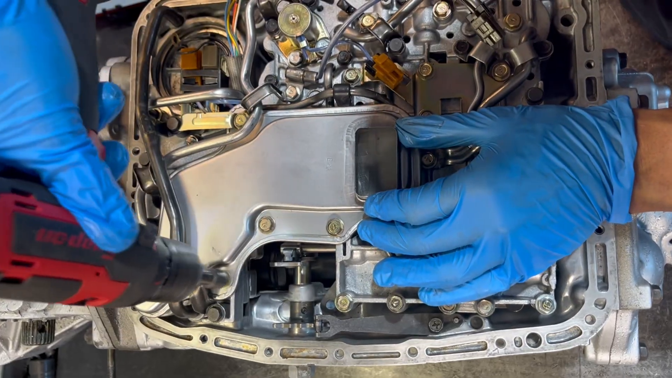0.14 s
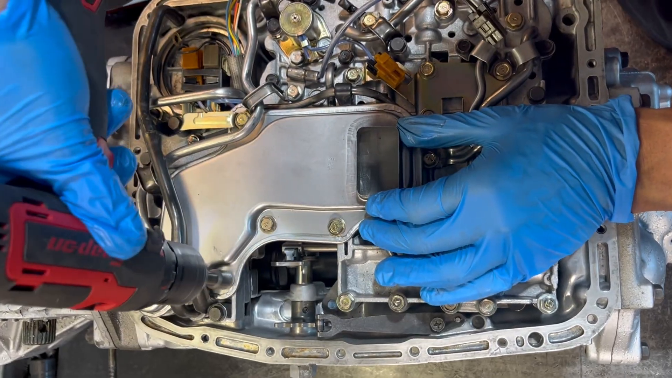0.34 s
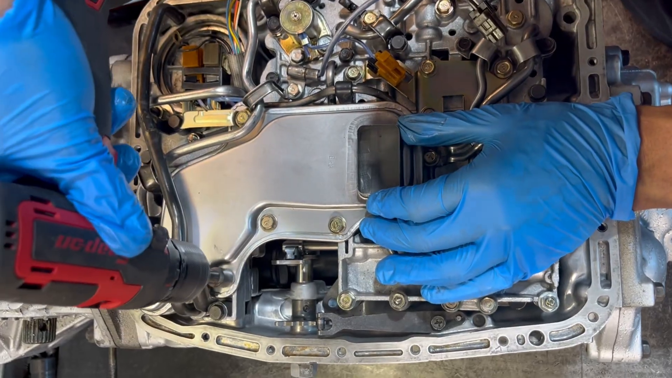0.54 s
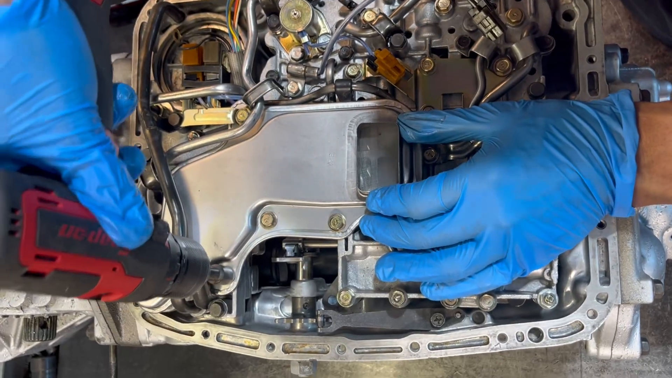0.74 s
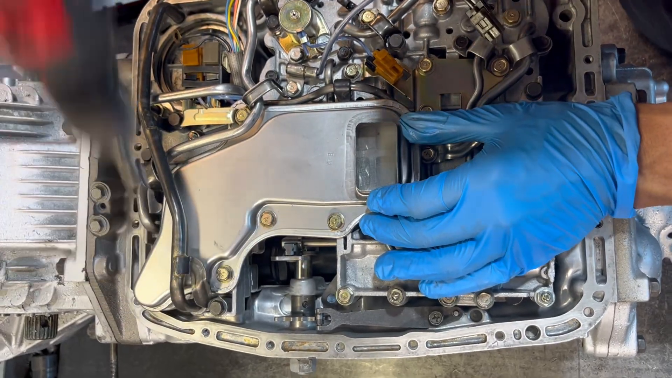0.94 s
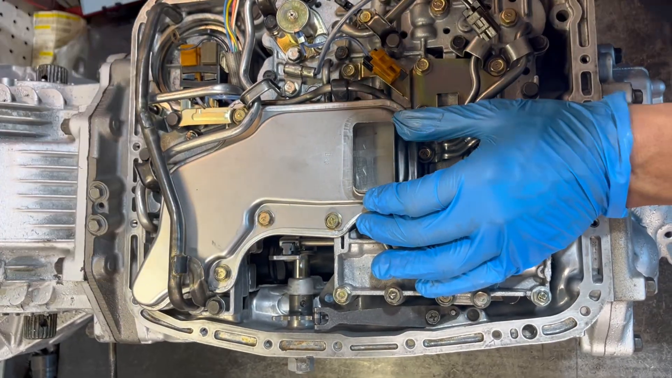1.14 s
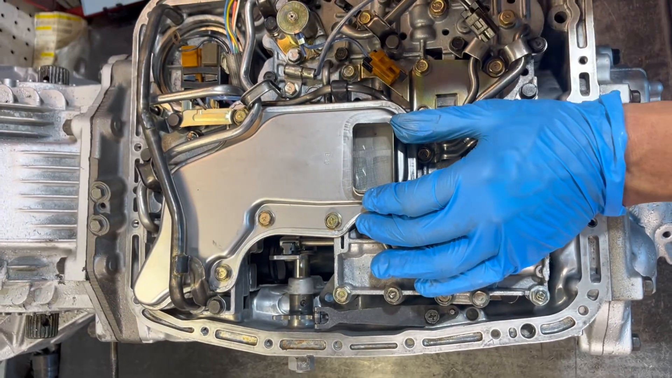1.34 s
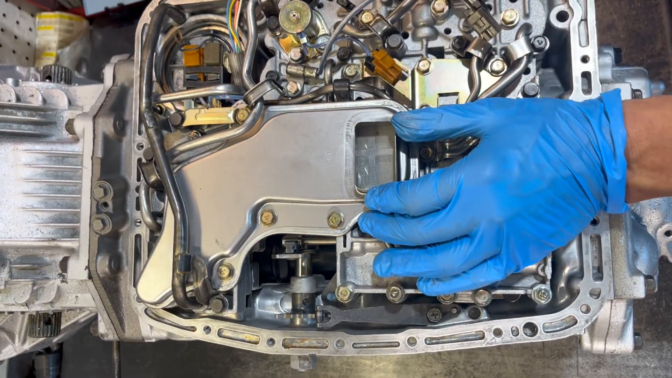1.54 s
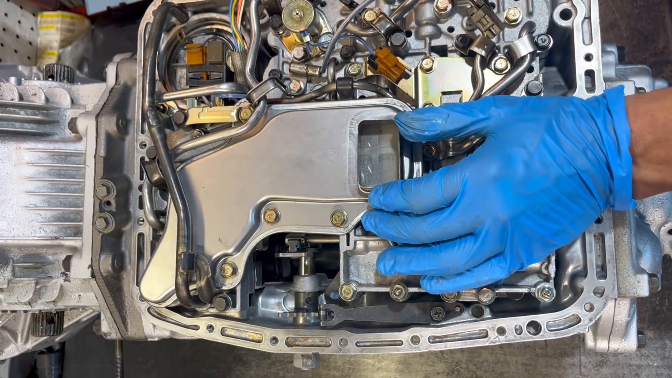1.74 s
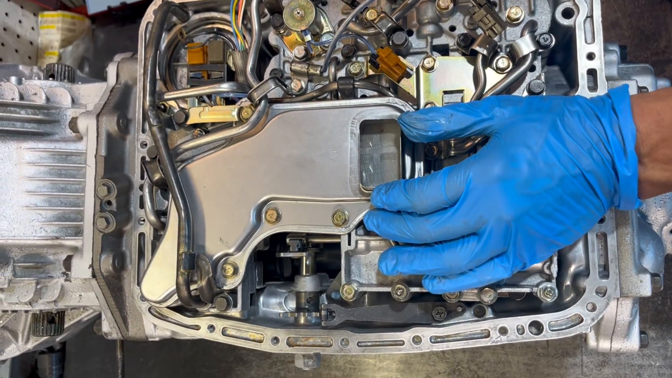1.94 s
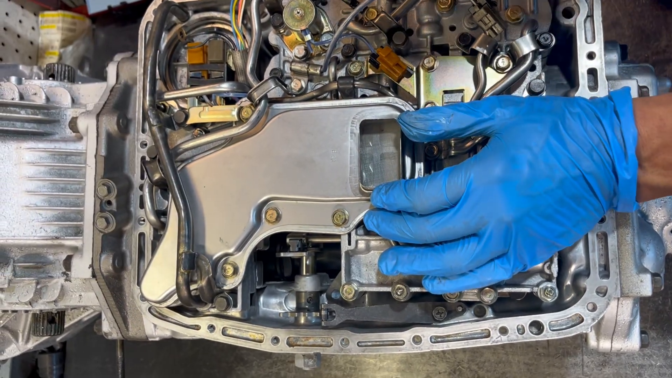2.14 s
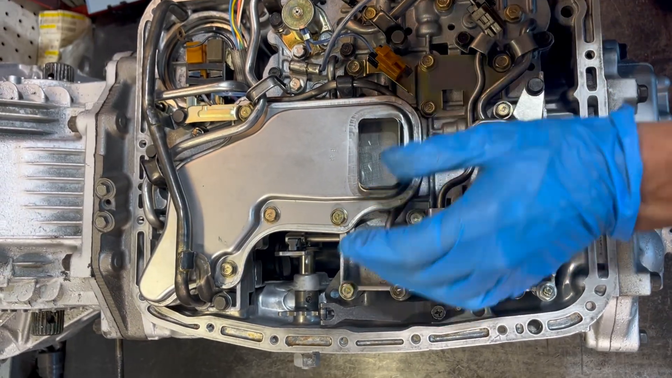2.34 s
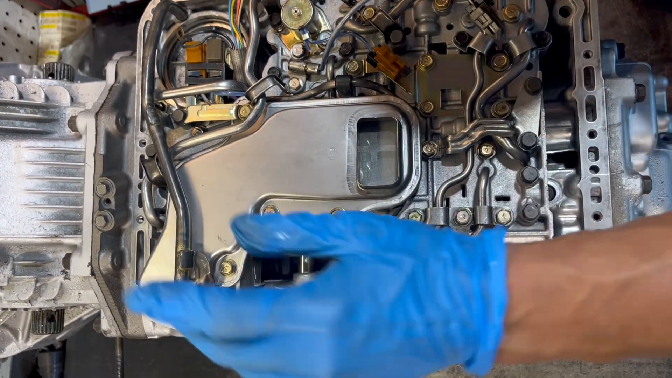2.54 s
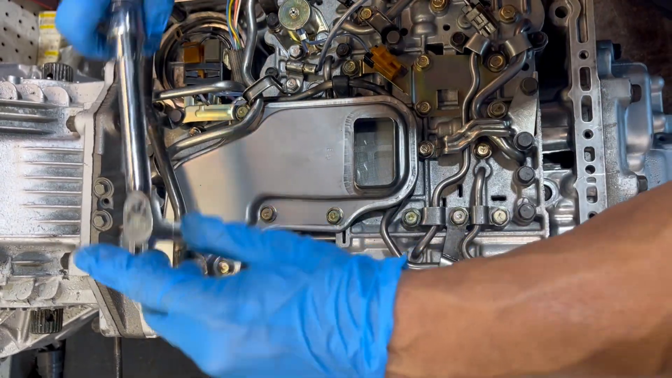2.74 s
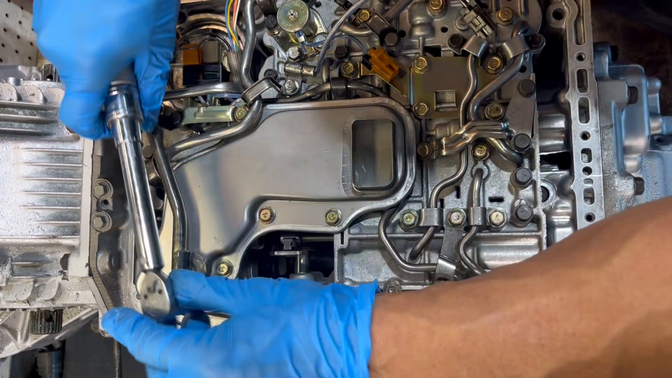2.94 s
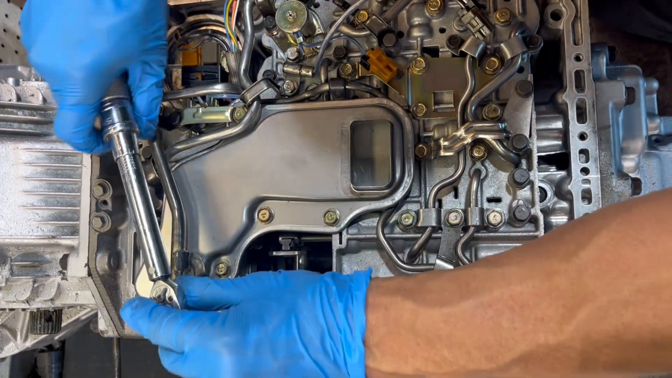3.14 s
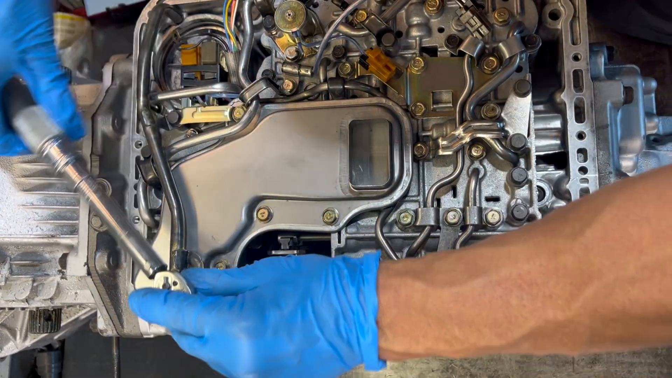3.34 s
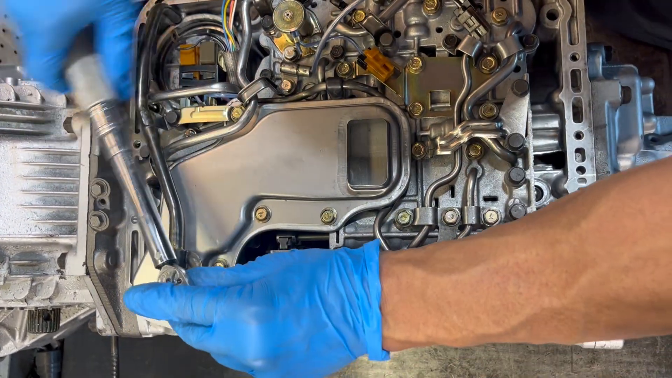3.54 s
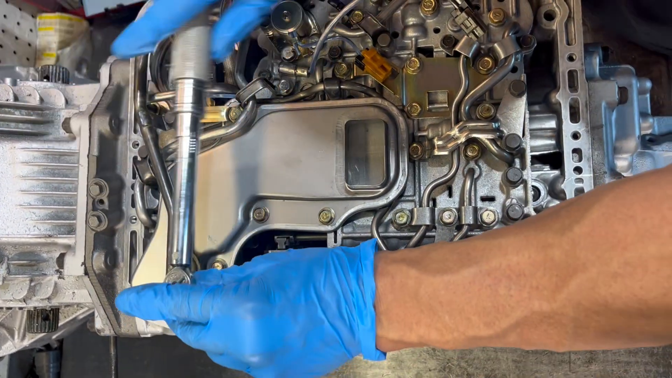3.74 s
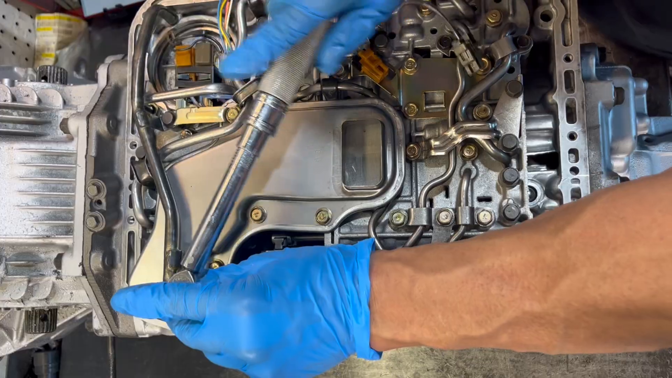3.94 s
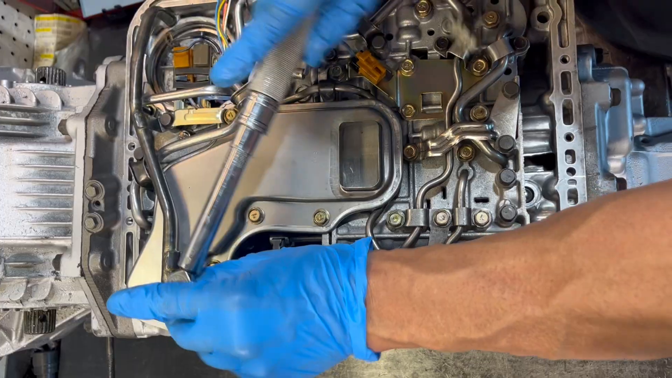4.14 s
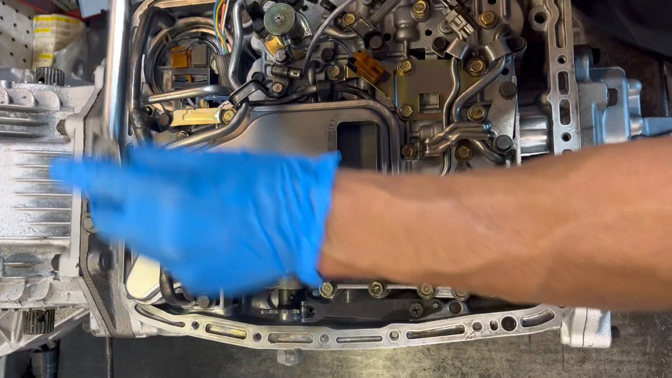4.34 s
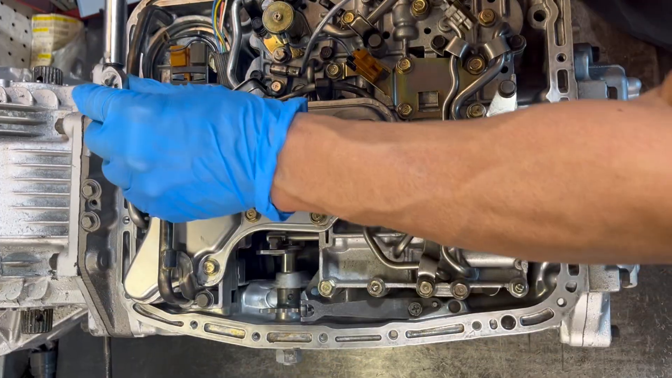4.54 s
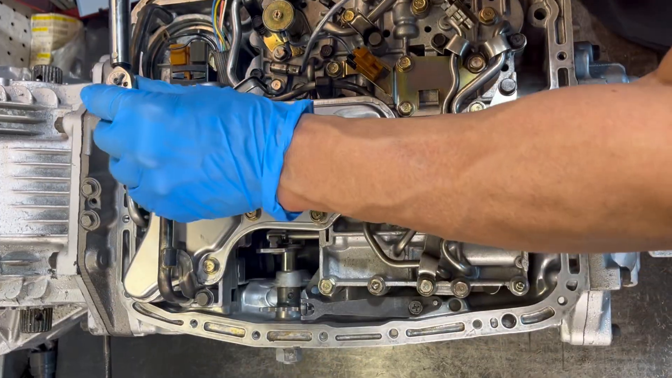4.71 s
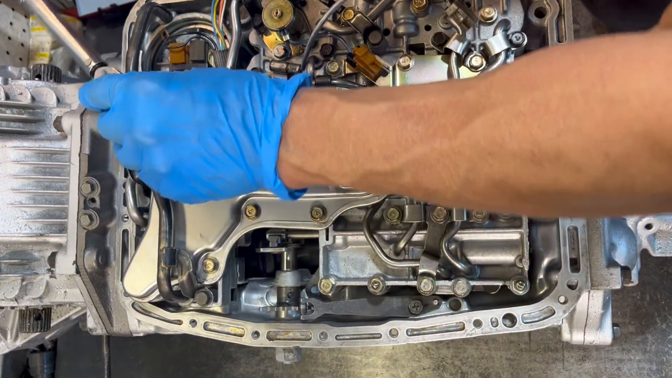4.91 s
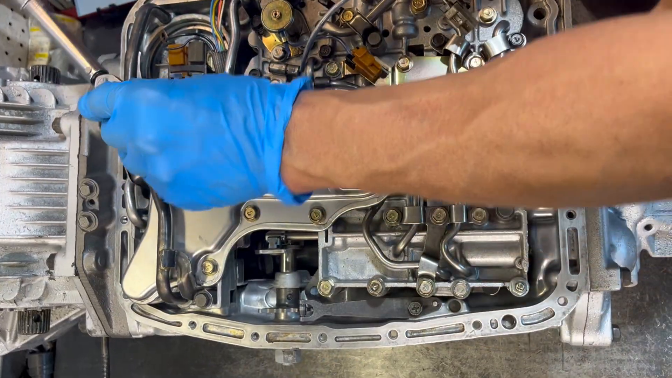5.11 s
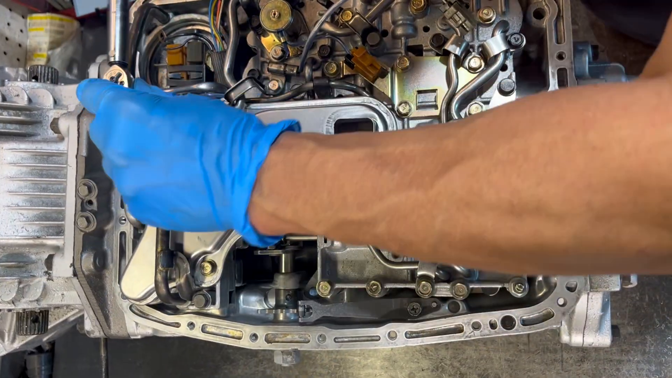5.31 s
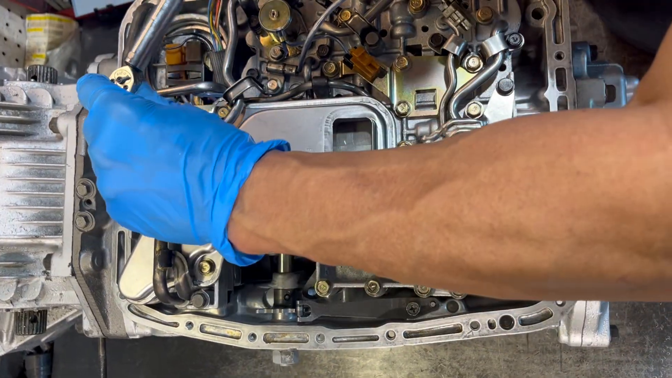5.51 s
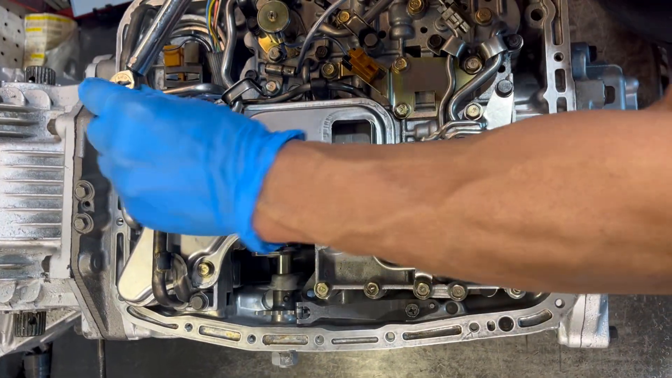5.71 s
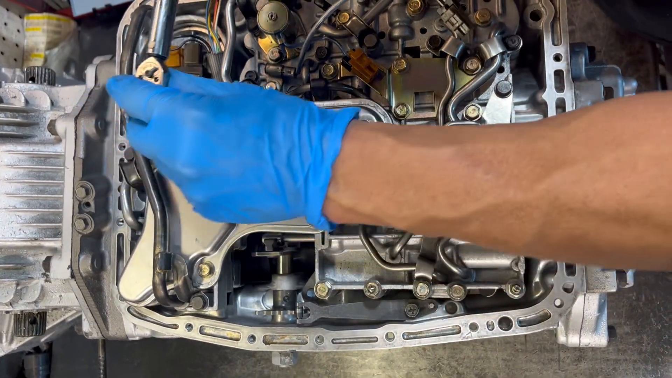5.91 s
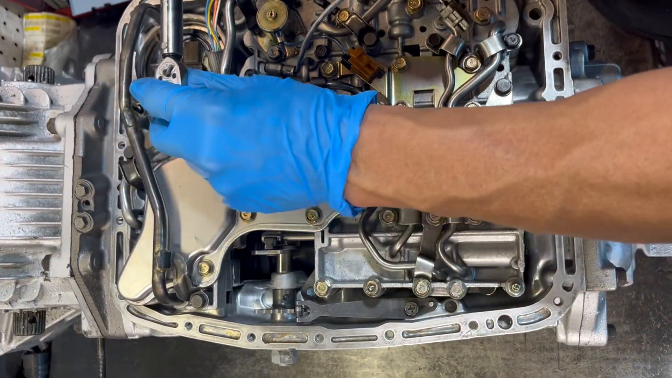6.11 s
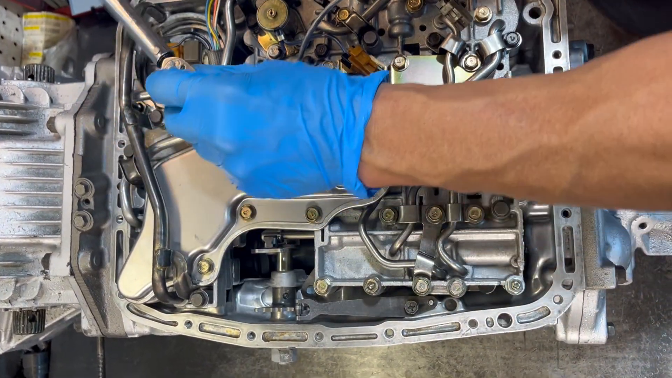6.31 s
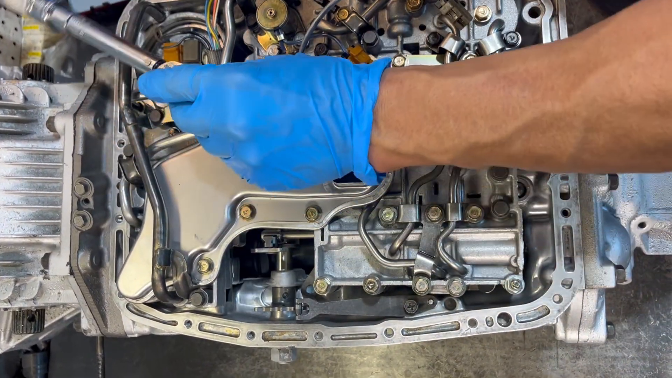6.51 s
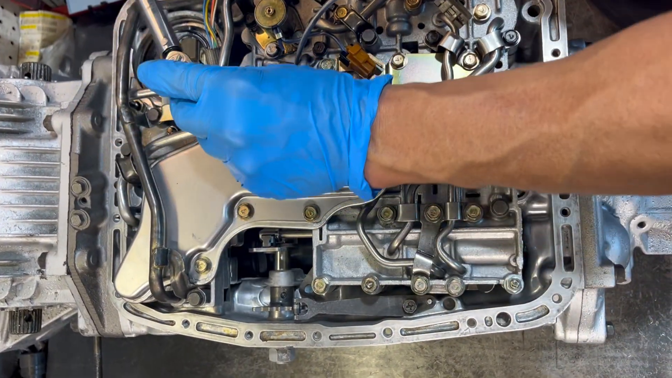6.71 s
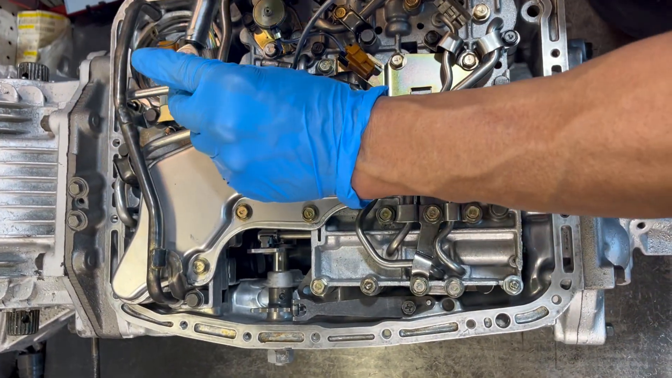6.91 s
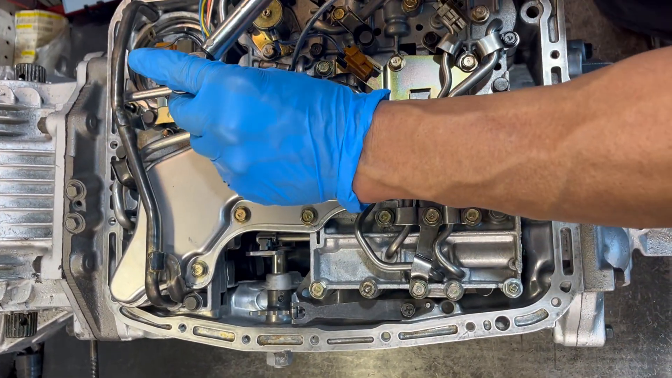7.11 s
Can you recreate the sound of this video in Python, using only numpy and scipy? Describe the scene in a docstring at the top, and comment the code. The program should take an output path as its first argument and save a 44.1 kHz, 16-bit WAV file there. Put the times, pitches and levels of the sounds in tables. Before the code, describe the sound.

A cordless driver whirs up and brakes, thuds down on a bench, then a ratcheting torque wrench clicks sharply on metal in a quiet workshop.

```python
"""In a workshop with a low rumble, a cordless driver runs a bolt into an aluminium casing and brakes.
It turns slowly, then at full speed: modulated gear noise, rotor overtones and a hum follow its speed.
It is dropped on a bench nearby, whose damped modes sound at each bounce. Then a torque wrench is set on
bolt heads, clicks over and ratchets back: short noise cracks with decaying modes. Faint coloured noise is
a settling rattle, then rustling gloves. A two-port pickup and a decaying room tail place the sources."""
import sys
import numpy as np
from scipy import signal
from scipy.fft import rfft, irfft
from scipy.io import wavfile
from scipy.ndimage import uniform_filter1d

SR = 44100
rng = np.random.default_rng(int(sys.argv[2]) if len(sys.argv) > 2 else 0)


def put_to_file(sound):
    """Save the sound as 16-bit audio at rate SR, in the file named by the first command-line argument."""
    columns = np.atleast_2d(sound).T  # one column per channel
    safe = np.clip(columns, -1, 1)
    whole_steps = np.round(safe * 32767)
    wavfile.write(sys.argv[1], SR, whole_steps.astype(np.int16))


N = 320166
TIME = np.arange(N) / SR  # s
FREQS = np.maximum(np.arange(N // 2 + 1) * SR / N, 1)  # Hz


def amp(db):
    """Decibel law: a level in dB becomes an amplitude ratio."""
    return 10 ** (np.asarray(db) / 20)


def unit(x):
    """Power normalisation: scale to an rms of 1."""
    return x / np.sqrt(np.mean(x ** 2) + 1e-20)


def curves(rows):
    """Linear interpolation: table columns over time, after a gate open only within the table."""
    s, *columns = np.transpose(rows)
    gate = np.clip(np.minimum(TIME - s[0], s[-1] - TIME) / 0.01, 0, 1)
    return [gate] + [np.interp(TIME, s, column) for column in columns]


def at_hz(points):
    """Logarithmic frequency scale: interpolate a table over log frequency on the FFT grid."""
    hz, value = np.transpose(points)
    return np.interp(np.log(FREQS), np.log(hz), value)


def colour(x, spectrum):
    """Linear filtering: shape a flat signal by a spectrum, to an rms of 1."""
    return unit(irfft(rfft(x) * amp(at_hz(spectrum)), N))


def band(x, low_hz, high_hz):
    """Band limitation: a causal band-pass."""
    return signal.sosfilt(signal.butter(2, [low_hz, high_hz], "band", fs=SR, output="sos"), x)


def drift(rate_hz):
    """Random modulation: noise through two equal low-pass poles, with an rms of 1."""
    pole = np.exp(-2 * np.pi * rate_hz / SR)
    noise = rng.standard_normal(N + SR)
    # the first second, while the filter settles, is dropped
    return unit(signal.lfilter([1], [1, -2 * pole, pole * pole], noise)[SR:])


def ring(force, hz, t60):
    """Damped resonance: a unit click sets a decaying sine of height 1 ringing."""
    radius = amp(-60 / (t60 * SR))
    angle = 2 * np.pi * hz / SR
    feedback = [1, -2 * radius * np.cos(angle), radius * radius]
    return signal.lfilter([0, np.sin(angle)], feedback, force + 1e-18)


def ports(x, lead, side):
    """Interaural-type cues: one source reaches two ports with phase and level differences."""
    half_phase = np.exp(.5j * np.interp(FREQS, *np.transpose(lead)))
    half = half_phase * amp(at_hz(side) / 2)
    return irfft(rfft(x) * np.array([half, 1 / half]), N)


def decays(rows, t60, rise_s):
    """Exponential decay: hits of (start in s, level in dB), each with a short linear rise."""
    out = np.zeros(N)
    for s, db in rows:
        t = np.clip(TIME - s, 0, None)
        out += amp(db - 60 * t / t60) * np.clip(t / rise_s, 0, 1)
    return out


# Likeness of the two ports in diffuse sound. Each row: frequency in Hz, correlation [0 to 1].
PORT_LIKENESS = [(100, 0.99), (400, 0.42), (4000, 0.22)]


def air(spectrum):
    """Diffuse-field coherence: stereo noise whose likeness falls with frequency."""
    mid, side = rfft(rng.standard_normal((2, N)))
    alike = np.clip(at_hz(PORT_LIKENESS), 0, 1)
    pair = np.sqrt(1 + alike) * mid + np.sqrt(1 - alike) * side * [[1], [-1]]
    return unit(irfft(pair * amp(at_hz(spectrum)), N))


# Spectrum of the steady workshop air. Each row: frequency in Hz, relative density in dB per Hz.
SHOP_SPECTRUM = [(15, -41), (25, -18), (70, 8), (161, -24.5), (195, -2), (236, -10), (695, -18),
                 (840, -22.5), (1790, -25.5), (16000, -56.5)]
# Swells of the rumble. Each row: start in seconds, level in dB.
RUMBLE_SWELLS = [(3.88, -46.5), (5.48, -49), (6.85, -61.5)]
# Spectrum of the faint treble noise. Each row: frequency in Hz, relative density in dB per Hz.
TREBLE_NOISE_SPECTRUM = [(880, -33.5), (1500, -5), (2720, -19.5), (12200, -17.5), (16000, -26)]
# Course of the faint treble noise: settling rattle, a sudden hush, then rustling.
# Each row: time in seconds, level in dB.
TREBLE_NOISE_LEVELS = [(1.5, -79), (1.9, -64), (2.42, -63), (2.46, -76.5), (2.76, -90), (2.85, -63.5),
                       (3.7, -66), (3.95, -70.5), (4.3, -69), (5.3, -73.5), (5.7, -71), (6.65, -64),
                       (6.75, -69.5), (6.93, -71), (7.0, -65.5)]
SHOP_AIR_DB, RUMBLE_DB = -56.5, -60.5
SWELL_RISE_S, SWELL_T60_S = 0.031, 2.57


def shop():
    """Filtered noise: steady air, a lumpy low rumble and a faint, uneven treble noise."""
    level = amp(RUMBLE_DB) + decays(RUMBLE_SWELLS, SWELL_T60_S, SWELL_RISE_S)
    lumps = amp(1.9 * drift(3.4))
    rumble = level * lumps * unit(band(rng.standard_normal(N), 21, 110))
    treble_db = curves(TREBLE_NOISE_LEVELS)[1]
    treble_noise = amp(treble_db + 2.3 * drift(27) + 1.3 * drift(4)) * air(TREBLE_NOISE_SPECTRUM)
    return amp(SHOP_AIR_DB) * air(SHOP_SPECTRUM) + rumble + treble_noise


# energies against the direct sound, before the band-pass
ROOM_DB, SCATTER_DB = -18.5, -6.478
ROOM_T60_S, SCATTER_T60_S, ROOM_DULL_HZ = 0.52, 0.045, 10800


def room(x):
    """Reverberant decay: scatter from parts nearby and a room tail, unrelated on each side."""
    t = TIME[:SR // 2]
    late = amp(ROOM_DB - 60 * t / ROOM_T60_S) / np.sqrt(ROOM_T60_S)
    early = amp(SCATTER_DB - 60 * t / SCATTER_T60_S) / np.sqrt(SCATTER_T60_S)
    noise = rng.standard_normal((2, SR // 2)) * (late + early) * (t > .0005)
    tail = band(noise, 230, ROOM_DULL_HZ)
    # ln(1e6) / SR brings a decaying noise to its stated energy
    return signal.fftconvolve(x, tail * np.sqrt(np.log(1e6) / SR), axes=1)[:, :N]


# Modes of the bench. Each row: frequency in Hz, bandwidth in Hz, relative level in dB.
BENCH_MODES = [(103, 190, -4), (280, 480, -2), (572, 160, -8)]
# Spectrum of the rattling things. Each row: frequency in Hz, relative density in dB per Hz.
RATTLE_SPECTRUM = [(500, -12.5), (900, -3), (1500, -3), (2400, -12), (4800, -7.5), (10000, -22.5),
                   (16000, -30.5)]
# The driver lands and rocks to rest. Each row: start in seconds, bench boom in dB, body knock in dB,
# rattle in dB, knock frequency in Hz.
DROP_BOUNCES = [(1.534, -17.5, -13.5, -18.5, 590), (1.569, -14.5, -20.5, -45, 332),
                (1.678, -10, -14.5, -19.5, 270), (1.721, -35.5, -28, -40, 374),
                (1.811, -20.5, -27, -50, 275), (1.888, -33.5, -50, -57, 296),
                (2.027, -36.5, -45.5, -62, 250)]
# The first touch is a hard crack. One row: start in seconds, level in dB.
FIRST_SMACK = (1.534, -9)
BOOM_RISE_S, KNOCK_RISE_S, RATTLE_RISE_S, SMACK_RISE_S = 0.023, 0.0051, 0.023, 0.0027
BOOM_T60_S, BODY_T60_S, RATTLE_T60_S, SMACK_T60_S = 0.33, 0.3, 0.29, 0.059


def drop():
    """Modal excitation by impact: bounces sound the bench modes, the body and rattling loose things."""
    bumps = rng.standard_normal(N) * amp(1.5 * drift(30))
    wood = 1.6 * bumps
    for hz, width_hz, db in BENCH_MODES:
        mode_t60 = np.log(1000) / np.pi / width_hz
        wood = wood + amp(db) * unit(ring(bumps, hz, mode_t60))
    s, boom_db, knock_db, rattle_db, knock_hz = np.transpose(DROP_BOUNCES)
    # the lows swell later and last longer than the knock
    boom = decays(zip(s, boom_db), BOOM_T60_S, BOOM_RISE_S) * unit(band(wood, 39, 190))
    body = unit(band(wood, 150, 860))
    # the upper part of the knock dies sooner
    upper = unit(band(bumps, 500, 1800))
    knock = decays(zip(s, knock_db - 12), .18, KNOCK_RISE_S) * upper
    for start, db, hz in zip(s, knock_db, knock_hz):
        tuned = unit(band(bumps, hz / 1.3, hz * 1.06))
        knock += decays([(start, db)], BODY_T60_S, KNOCK_RISE_S) * (0.51 * body + 0.72 * tuned)
    rattle = colour(rng.standard_normal(N) * amp(3.0 * drift(150)), RATTLE_SPECTRUM)
    rattle *= decays(zip(s, rattle_db), RATTLE_T60_S, RATTLE_RISE_S)
    crack = unit(band(bumps, 1000, 8900))
    smack = decays([FIRST_SMACK], SMACK_T60_S, SMACK_RISE_S) * crack
    return boom + knock + smack + rattle


# Course of the driver. Each row: time in seconds, rotor speed in turns per second, gear noise in dB.
DRIVER_COURSE = [(0, 96, -54), (.04, 98, -34.5), (.2, 113.6, -29), (.39, 118, -28.5), (.46, 127, -28.5),
                 (.51, 150, -29), (.536, 178, -16.5), (.715, 180.4, -16.5), (.762, 166, -18.5),
                 (.78, 157, -33), (.815, 140, -41.5), (.86, 130, -63)]
# Gear noise under load. Each row: frequency in Hz, relative density in dB per Hz.
LOADED_GEARS = [(150, -13.5), (250, -11.5), (670, -7.5), (850, -9), (1350, -7), (1800, -7), (4200, -4.5),
                (7300, -10), (15000, -16)]
# Gear noise at full speed. Each row: frequency in Hz, relative density in dB per Hz.
FAST_GEARS = [(150, -32.5), (400, -17), (900, -9.5), (1250, -5.5), (1900, -6), (2500, -5.5), (3100, 1.5),
              (5500, 0.5), (9000, -2), (15000, -3)]
# The socket knocks on the bolt. Each row: start in seconds, level in dB.
SOCKET_KNOCKS = [(0.161, -12.5), (0.205, -22), (0.2533, -22), (0.2873, -20), (0.3353, -16), (0.375, -17),
                 (0.5243, -17.5)]
# The brake catches and bounces. Each row: start in seconds, level in dB.
BRAKE_KNOCKS = [(0.7890, -11.5), (0.8060, -18.5)]
# Hum at the rotor's turning rate. Each row: time in seconds, level in dB.
ROTOR_HUM = [(0, -74), (.05, -54.5), (.11, -34.5), (.17, -46.5), (.24, -45.5), (.38, -38.5), (.44, -40.5),
             (.48, -54), (.57, -44.5), (.66, -52.5), (.86, -56.5)]
KNOCK_T60_S, BRAKE_T60_S = 0.053, 0.024
# overtones before the gear colour; their gain at full speed; their unsteadiness
WHINE_DB, WHINE_FAST_DB, WHINE_WAVER_DB = -26, 10.5, 4
# gear noise given off by the casing, against the driver's own; how strongly the driver rings the pan
CASING_SHARE_DB, PAN_DRIVEN_DB = -3, -58
PAN_HZ, PAN_T60_S = 1245, .55  # the filter pan rings longest of the casing's modes


def driver():
    """Rotational harmonics: rotor overtones, gear noise modulated by the turns, knocks and a driven pan."""
    gate, speed, level_db = curves(DRIVER_COURSE)
    turns = np.cumsum(speed * (1 + .004 * drift(35))) / SR
    fast = np.clip((speed - 135) / 35, 0, 1)
    # overtones 5 to 12 of the rotor waver at separate times; the 17th joins at full speed
    waver = amp(WHINE_WAVER_DB * drift(25))
    whine = np.zeros(N)
    for k in [*range(5, 13), 17]:
        level = np.roll(waver, k * SR // 3)[:SR]
        if k == 17:
            level = level * fast[:SR]
        phase = rng.uniform(0, 2 * np.pi)
        whine[:SR] += level * np.sin(k * 2 * np.pi * turns[:SR] + phase)
    # the noise swells once and twice a turn
    swell = 1 + .3 * np.cos(2 * np.pi * turns) + .25 * np.cos(4 * np.pi * turns)
    # at full speed the overtones stand out more from the noise
    teeth = amp(WHINE_DB + WHINE_FAST_DB * fast) * whine + swell * rng.standard_normal((2, N))
    gears = (1 - fast) * colour(teeth, LOADED_GEARS) + fast * colour(teeth, FAST_GEARS)
    # even out the power over 2000 samples, so that the table sets the level
    gears = gears / np.sqrt(uniform_filter1d(gears ** 2, 2000))
    hits = decays(SOCKET_KNOCKS, KNOCK_T60_S, 0.0011) + decays(BRAKE_KNOCKS, BRAKE_T60_S, 0.00059)
    knocks = hits * colour(rng.standard_normal(N), LOADED_GEARS)
    hum_db = curves(ROTOR_HUM)[1]
    hum = np.sqrt(2) * amp(hum_db + 3.5 * drift(35)) * np.sin(2 * np.pi * turns)
    body = gate * (amp(level_db) * gears[0] + hum) + knocks
    casing = gate * amp(level_db + CASING_SHARE_DB) * gears[1]
    pan = amp(PAN_DRIVEN_DB) * ring(body, PAN_HZ, PAN_T60_S)
    return body + pan, casing


# The socket slides over a bolt head. Each row: start in seconds, length in seconds, level in dB.
SOCKET_SCRAPES = [(3.793, 0.032, -43.5), (4.141, 0.068, -50.5), (5.112, 0.063, -54), (6.032, 0.041, -40.5),
                  (6.271, 0.037, -48), (6.523, 0.1, -54.5), (6.791, 0.11, -56.5)]


def scrapes():
    """Friction noise: sliding metal gives uneven grains under a swelling stroke."""
    grains = rng.standard_normal(N) * amp(4.0 * drift(150))
    stroke = np.zeros(N)
    for s, length_s, db in SOCKET_SCRAPES:
        progress = np.clip((TIME - s) / length_s, 0, 1)
        stroke += amp(db) * np.clip(np.sin(np.pi * progress), 0, 1) ** 2
    return stroke * unit(band(grains, 460, 3330))


# Contacts of wrench and socket. Each row: start in seconds, strength in dB, share of the low band in dB,
# share of the band above 6 kHz in dB.
WRENCH_CONTACTS = [(2.777, -28, -14.5, -13), (2.808, -34, -6, -12), (2.992, -6, -19, -51),
                   (3.048, -28, -9, -39.5), (3.094, -16.5, -12.5, -16), (3.265, -32, -24.5, -1),
                   (3.319, -27.5, -30, -1.5), (3.808, -36.5, -21, -6), (3.878, -32.5, -22, -4.5),
                   (3.914, -21, -23, -1.5), (4.108, -37, -8, -12), (4.175, -20.5, -17.5, -2.5),
                   (4.517, -15, -18, -34), (4.533, 2, -23, -2.5), (4.664, -1.5, -20.5, -4),
                   (4.822, -27.5, -30, -1.5), (4.875, -23.5, -23, -4), (4.947, -30.5, -25, -1),
                   (5.487, -22.5, -21, -2.5), (5.629, -34, -13.5, -7.5), (5.736, -18.5, -12, -17),
                   (5.976, -7.5, -4, -3.5), (6.06, -4.5, -10, -15), (6.16, -45, -3.5, -40),
                   (6.238, -27.5, -19.5, -1.5), (6.299, -19.5, -16, -1), (6.375, -21, -25.5, -4),
                   (6.422, -44, 0, -45), (7.237, -34.5, -8.5, -6)]
# Modes of the aluminium casing. Each row: frequency in Hz, relative level in dB, t60 in seconds.
CASING_MODES = [(1099, -1, 0.05), (1182, -13, 0.18), (1371, 3.5, 0.075), (1489, 4, 0.077), (1638, 4, 0.1),
                (2070, -16.5, 0.098)]
# Loose parts that ring on after a touch. Each row: start in seconds, frequency in Hz, level in dB,
# t60 in seconds.
LOOSE_RINGS = [(2.811, 755, -54, 0.2), (3.878, 3536, -41, 0.18), (3.877, 4200, -38, 0.044),
               (4.179, 774, -57, 0.35), (4.181, 1957, -34, 0.1), (5.486, 2063, -39, 0.058),
               (5.738, 3255, -29, 0.07), (5.977, 3100, -23, 0.05), (6.059, 3200, -21, 0.035),
               (6.062, 4457, -24, 0.07)]
RING_WAVER_DB = 3.5  # loose parts ring unevenly
LEAD_IN_S = .015  # each contact swells briefly before its peak


def wrench():
    """Modal superposition: each contact is a short crack with the wrench's dense modes and the casing's."""
    white = rng.standard_normal(N) * amp(2.5 * drift(440))
    thud = unit(band(white, 250, 320))
    low = unit(band(white, 900, 1360))
    middle = unit(band(white, 2000, 8080))
    high = unit(band(white, 6000, 16900))
    out = np.zeros(N + SR)
    length, count = SR // 4, 48  # samples per contact, wrench modes
    t = TIME[:length]
    after = np.clip(t - LEAD_IN_S, 0, None)
    swelling = amp(-10.5 - 9.5 * (3.5 - t / LEAD_IN_S))
    striking = np.clip((t - LEAD_IN_S) / 0.003, .14, 1)
    rise = np.where(t < LEAD_IN_S, swelling, striking)
    steel_hz = np.geomspace(1900, 15500, count) * amp(rng.normal(0, 0.1364, count))
    steel_phase = rng.uniform(0, 2 * np.pi, (count, 1))
    steel = np.sin(2 * np.pi * steel_hz[:, None] * t + steel_phase)
    modes = [*CASING_MODES, (PAN_HZ, -24, PAN_T60_S)]
    body = np.array([amp(db - 60 * after / t60) * np.sin(2 * np.pi * hz * t) for hz, db, t60 in modes])
    # every contact excites every mode with its own chance strength and sign
    shape = (len(WRENCH_CONTACTS), count + len(body))
    lucks = amp(rng.normal(0, 2.7, shape)) * rng.choice([-1, 1], shape)
    for (s, db, low_db, high_db), luck in zip(WRENCH_CONTACTS, lucks):
        start = round((s - LEAD_IN_S) * SR)
        take = np.arange(start, start + length) % N
        # the middle band holds the power that the outer bands leave
        rest = np.sqrt(np.clip(1 - amp(2 * low_db) - amp(2 * high_db), .05, 1))
        crack = amp(low_db) * (low[take] + 0.22 * thud[take])
        crack = crack + rest * middle[take] + amp(high_db) * high[take]
        clatter = (luck[:count] * np.where(steel_hz > 6000, amp(high_db), rest)) @ steel
        # a sharp snap, then a tail; light touches ring a little longer
        tail_t60 = .05 - 0.0012 * (db + 19.5)
        fall = amp(-60 * after / tail_t60) + 1.48 * amp(-60 * after / 0.012)
        dying = fall * (amp(-11.0) * crack + amp(-24.5) * clatter)
        casing = amp(low_db - 8.0) * (luck[count:] @ body)
        out[start:start + length] += amp(db) * rise * (dying + casing)
    waver = amp(RING_WAVER_DB * drift(62))
    for s, hz, db, t60 in LOOSE_RINGS:
        out[:N] += decays([(s, db)], t60, 0.002) * waver * np.sin(2 * np.pi * hz * TIME)
    return out[:N]


# Phase between the ports for each place. Each row: frequency in Hz, lead of the left in radians.
DRIVER_PHASE = [(0, 0), (1640, -0.7), (2840, 1.2), (3620, 0.3), (4400, -2.4), (6370, -2.9), (9560, 0.1),
                (11600, 2.9), (16400, 6.6)]
BENCH_PHASE = [(0, 0), (1290, -0.7), (3190, 2.8), (5510, -3.5), (16000, 6.7), (16400, 8.8)]
WRENCH_PHASE = [(0, -2.5), (1120, 0.24), (2760, 2), (4220, 1.03), (11500, 9), (16400, 12.5)]
# Level between the ports for each place. Each row: frequency in Hz, left minus right in dB.
DRIVER_BALANCE = [(400, 1.5), (2400, -2.5)]
BENCH_BALANCE = [(60, .5), (300, 1.1), (4000, -.5)]
WRENCH_BALANCE = [(500, 3.5), (2000, -0.5), (8000, 0.8)]
# The wrench moves. Each row: time in seconds, added left minus right in dB.
WRENCH_MOVES = [(5.3, 0), (5.7, -2.6), (6.4, -2.6), (6.6, 0)]


def scene():
    """Superposition: all sources at the two ports, with room and background."""
    pan_db = np.interp(TIME, *np.transpose(WRENCH_MOVES))
    tool, casing = driver()
    near = ports(tool, DRIVER_PHASE, DRIVER_BALANCE)
    near = near + ports(casing + drop(), BENCH_PHASE, BENCH_BALANCE)
    wrench_pair = ports(wrench() + scrapes(), WRENCH_PHASE, WRENCH_BALANCE)
    near = near + wrench_pair * amp([pan_db / 2, -pan_db / 2])
    return near + room(near) + shop()


# Overall treble colour, with a dip near 12 to 13 kHz. Each row: frequency in Hz, gain in dB.
TREBLE_COLOUR = [(11200, 1.5), (11900, -4.5), (13200, -9), (13800, 0)]
CUTOFF_HZ = 16800


def record(dry):
    """Transmission chain: overall treble colour, bass roll-off, soft saturation and a steep top cut."""
    coloured = irfft(rfft(dry) * amp(at_hz(TREBLE_COLOUR)), N)
    coloured = signal.sosfilt(signal.butter(4, 38, "high", fs=SR, output="sos"), coloured)
    # the loudest peaks are rounded
    coloured = .95 * np.tanh(coloured / .95)
    return signal.sosfilt(signal.cheby2(14, 80, CUTOFF_HZ, fs=SR, output="sos"), coloured)


dry = scene()
out = record(dry)
put_to_file(out)
```